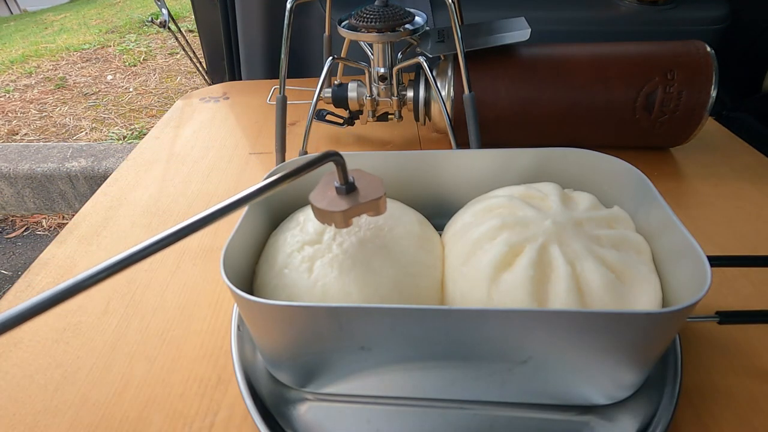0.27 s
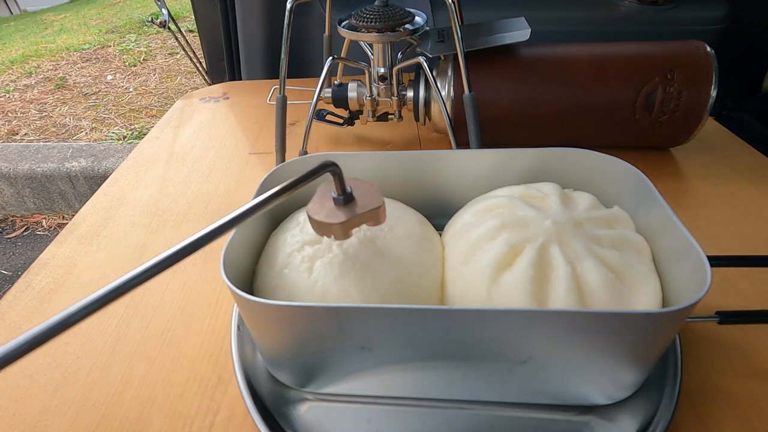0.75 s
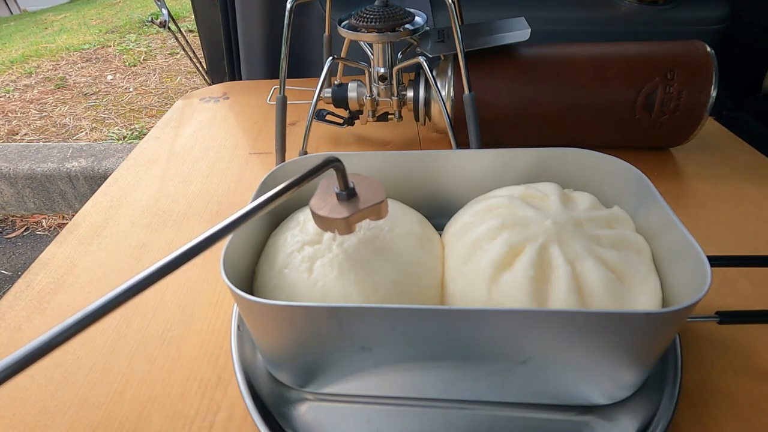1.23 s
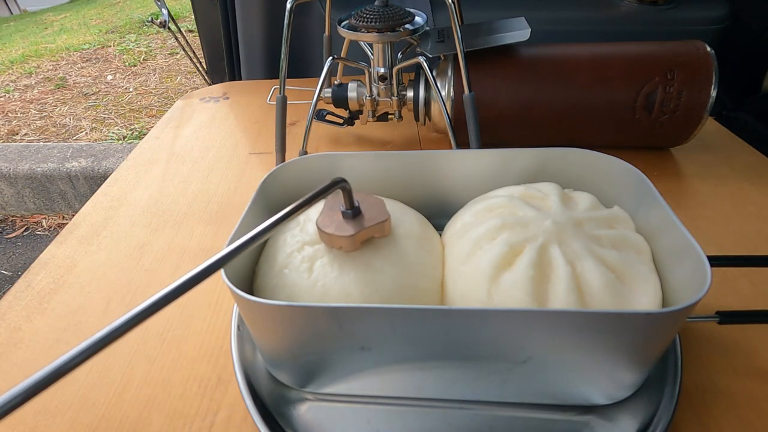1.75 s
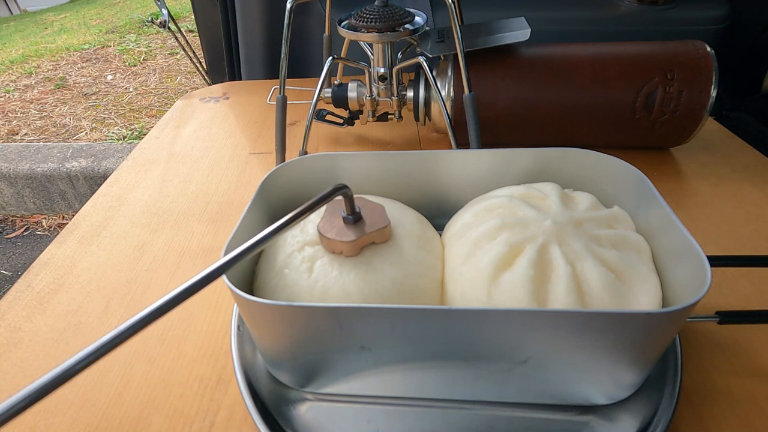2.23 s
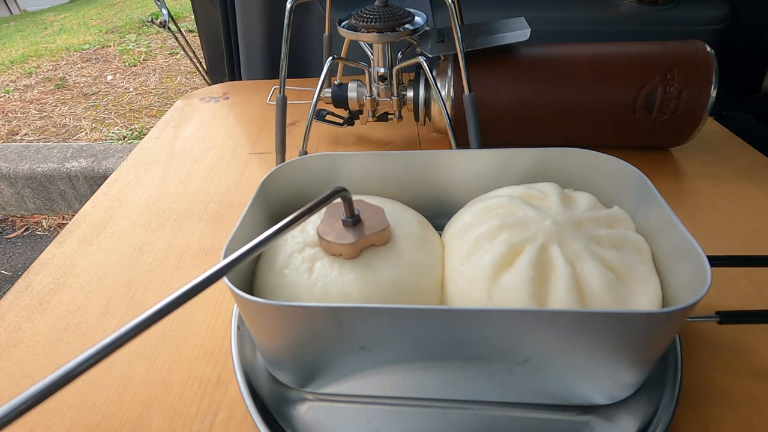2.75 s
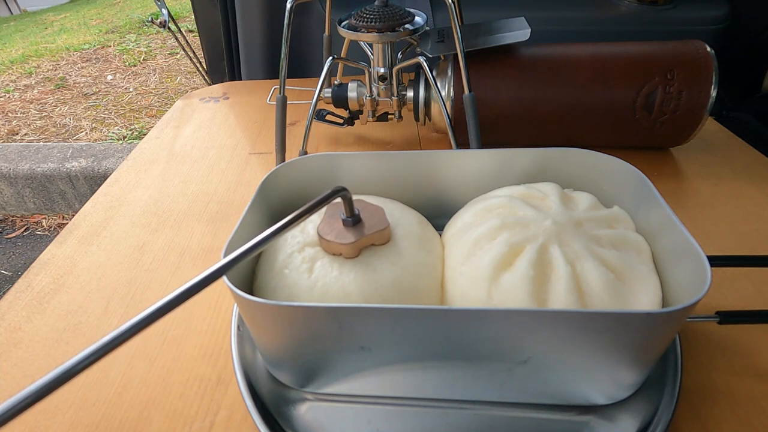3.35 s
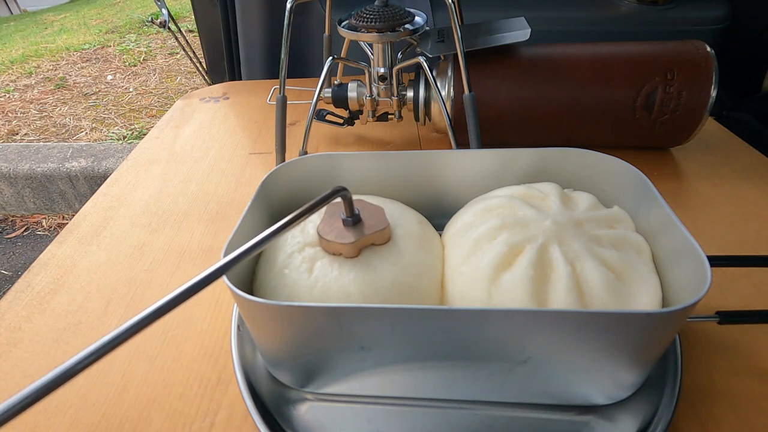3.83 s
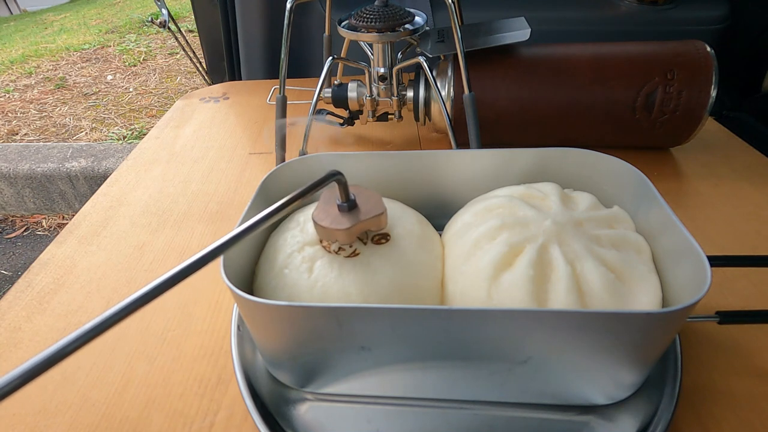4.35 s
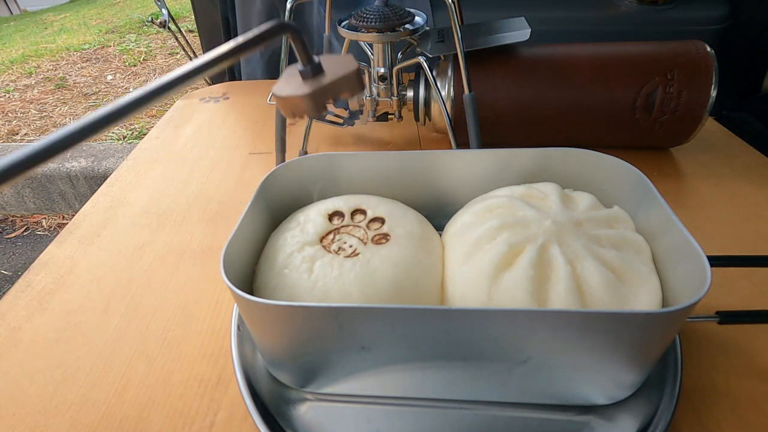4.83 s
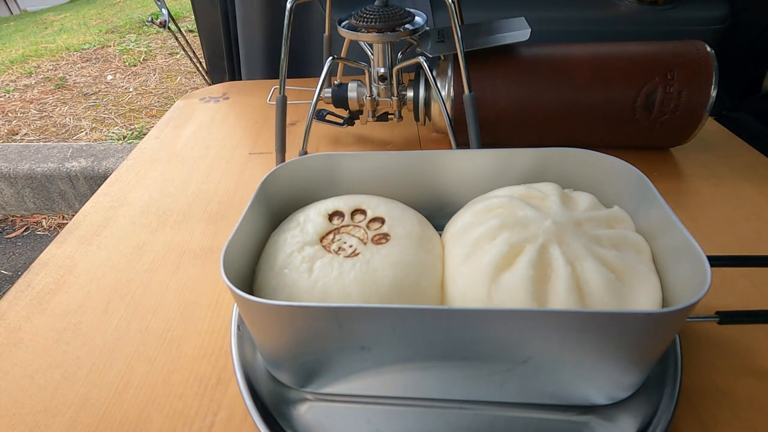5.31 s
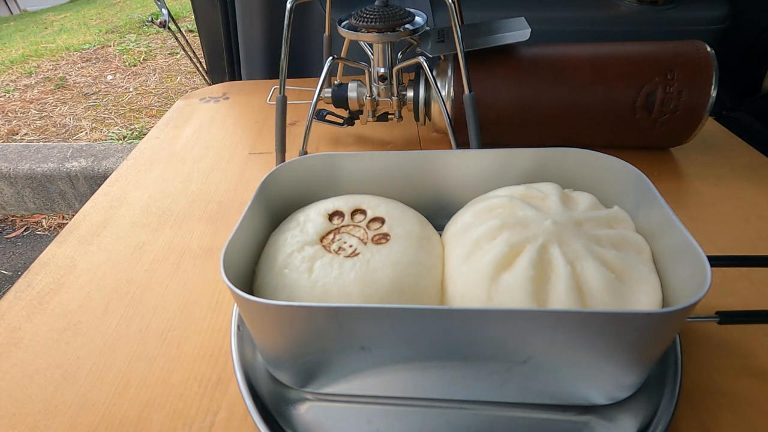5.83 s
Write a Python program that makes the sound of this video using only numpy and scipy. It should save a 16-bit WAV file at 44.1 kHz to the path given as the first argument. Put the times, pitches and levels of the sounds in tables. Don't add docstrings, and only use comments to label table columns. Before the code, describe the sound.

A quiet outdoor place: low wind buffeting the microphone, faint far traffic and leaves, a thin high insect drone and a few distant bird notes. Close up, a hot iron touches a steamed bun with light ticks, then bursts into a dense, bright, crackling sizzle. It grows drier and more broken, stops as the iron lifts, and leaves wind, insects and a far bird whistling more.

```python
import sys
import numpy as np
from scipy import signal
from scipy.fft import rfft, irfft
from scipy.io import wavfile
from scipy.ndimage import uniform_filter1d

SR = 44100
rng = np.random.default_rng(int(sys.argv[2]) if len(sys.argv) > 2 else 0)


def persist_wave(psi):
    counts = np.round(np.clip(psi, -1, 1) * 32767).astype(np.int16)
    wavfile.write(sys.argv[1], SR, np.atleast_2d(counts).T)


def level_to_linear(level):
    exponent = np.asarray(level, float) / 20
    return 10 ** exponent


N = 267687

POCKETS = 10
MEAN_HZ, HZ_PER_POCKET = 7600, 170
RISE_S_PER_KHZ = 3.5e-5


def sizzle():
    vigour_db, steps_up, lull_db, pressed = contact()
    at, peak_db = large_bursts()
    crowd = crowding(at, peak_db)
    bursts = all_bursts(vigour_db - 0.3 * lull_db, crowd, pressed, at, peak_db)
    pops = bursts + steam(vigour_db, lull_db, crowd, pressed)
    thuds = thud_clicks(pops)

    dealt = rng.integers(0, POCKETS, N) + np.round(steps_up).astype(int)
    dealt = np.minimum(dealt, POCKETS - 1)
    lags = 0.045 + 0.33 * rng.permutation(np.linspace(-1, 1, POCKETS))
    by_pitch = np.round(POCKETS / 2 + (burst_pitch(at, steps_up) - MEAN_HZ) / HZ_PER_POCKET)
    dealt[at] = np.clip(by_pitch, 0, POCKETS - 1)
    deep = rng.integers(0, POCKETS // 2, N)

    heard = ringing(pops, dealt, lags) + thudding(thuds, deep, lags) * level_to_linear([[-1.2], [1.2]])
    heard = heard + spray(bursts, vigour_db, lull_db, pressed)
    return lows_first(heard) * level_to_linear([[-.1], [.1]])


# (t/s, vigour level/dB, pitch steps up)
IRON_CONTACT = [
    (1.83, -81, 2),
    (1.88, -59.5, 8),
    (2.12, -51.5, 2),
    (2.19, -44.5, 0),
    (2.45, -40, -2),
    (3.6, -44.5, 0),
    (4.16, -47, 3),
    (4.21, -68, 17),
    (4.3, -81, 3),
]
# (t/s, length/s, depth/dB)
SEAL_LULLS = [(2.58, 0.024, 14), (2.775, 0.054, 8), (2.855, 0.035, 8), (2.96, .03, 14), (3.063, 0.014, 20),
              (3.243, 0.031, 16), (3.4, .016, 12), (3.508, 0.019, 12), (3.56, 0.0086, 18), (3.74, .04, 7),
              (3.81, 0.02, 12), (3.94, 0.016, 8), (4.045, .015, 8), (4.09, 0.017, 10), (4.159, .009, 18)]


def contact():
    vigour_db, steps_up = in_time(IRON_CONTACT)
    t = np.arange(N) / SR
    pressed = (t > IRON_CONTACT[0][0]) & (t < IRON_CONTACT[-1][0])
    return vigour_db, steps_up, bumps(SEAL_LULLS), pressed


# (t/s, peak level/dB, f/Hz)
TOUCH_BURSTS = [(1.8697, -26, 8500), (1.9185, -35, 9200), (1.9356, -32, 8900), (1.9433, -34, 8800),
                (1.9689, -36, 8000), (1.9923, -30, 7200), (2.0087, -33, 7400), (2.0167, -30, 7900),
                (2.0219, -33, 8300), (2.0337, -31, 8500), (2.0419, -26, 8400), (2.0466, -30, 7700),
                (2.0514, -32, 7800), (2.0581, -27, 8200), (2.0624, -31, 8200), (2.0666, -29, 8500),
                (2.0761, -34, 8200), (2.0825, -29, 8400), (2.0878, -34, 8400), (2.0925, -33, 7700),
                (2.1056, -28, 8300), (2.1153, -30, 8300), (2.1232, -36, 8700), (2.1299, -30, 7600),
                (2.1357, -24, 8700), (2.1399, -25, 8600), (2.1466, -25, 8100), (2.1526, -31, 8000),
                (2.1607, -23, 8900), (2.1671, -26, 8400)]
# (t/s, peak level/dB, f/Hz)
PEEL_TICKS = [
    (4.1825, -36, 8800),
    (4.198, -41, 9000),
    (4.2015, -40, 8000),
    (4.208, -44, 9000),
    (4.2344, -28, 7300),
    (4.2373, -37, 8000),
    (4.2631, -31, 7800),
    (4.392, -54, 8000),
    (4.4672, -49, 8500),
]
# (t/s, peak level/dB)
SINKING_BURSTS = [(2.1777, -21), (2.1842, -15), (2.192, -19), (2.1989, -22), (2.208, -17), (2.2222, -23),
                  (2.2248, -21), (2.2384, -24), (2.2429, -23), (2.2468, -24), (2.2579, -19), (2.2681, -23),
                  (2.2693, -20), (2.2766, -22), (2.2829, -18), (2.2903, -20), (2.2917, -19), (2.2956, -18),
                  (2.297, -19), (2.2992, -16), (2.3038, -21), (2.3243, -18), (2.3286, -22), (2.331, -18),
                  (2.3355, -19), (2.3365, -20), (2.3401, -23), (2.3452, -21), (2.3496, -22), (2.3572, -21),
                  (2.3652, -19), (2.3677, -19), (2.3714, -22), (2.3908, -15), (2.4068, -20), (2.4112, -16),
                  (2.4129, -20), (2.4174, -22), (2.4229, -22), (2.4312, -20), (2.4337, -18), (2.4392, -17),
                  (2.4437, -22), (2.448, -20), (2.46, -19), (2.465, -14), (2.4694, -19), (2.4771, -17),
                  (2.48, -20), (2.4823, -19), (2.4834, -13), (2.4952, -18), (2.5016, -18), (2.504, -20),
                  (2.5113, -20), (2.525, -16), (2.5349, -22), (2.5365, -23)]
# (t/s, peak level/dB)
SEALED_BURSTS = [(2.5401, -21), (2.546, -21), (2.5473, -18), (2.5483, -18), (2.5574, -22), (2.5605, -18),
                 (2.5656, -23), (2.5673, -20), (2.5879, -25), (2.5932, -18), (2.597, -19), (2.6025, -22),
                 (2.617, -19), (2.6187, -20), (2.6215, -20), (2.623, -22), (2.6249, -20), (2.6399, -22),
                 (2.6486, -24), (2.6557, -19), (2.6622, -19), (2.6705, -18), (2.6752, -21), (2.6783, -21),
                 (2.6796, -21), (2.6846, -20), (2.6858, -21), (2.6901, -20), (2.6962, -13), (2.6984, -17),
                 (2.7032, -20), (2.7152, -16), (2.7252, -21), (2.7263, -15), (2.7349, -20), (2.7378, -17),
                 (2.7392, -18), (2.7441, -18), (2.7453, -22), (2.7502, -22), (2.7531, -19), (2.7609, -24),
                 (2.765, -23), (2.7675, -23), (2.7706, -23), (2.7722, -23), (2.7828, -25), (2.7844, -23),
                 (2.7871, -19), (2.7916, -20), (2.8083, -20), (2.81, -21), (2.8111, -16), (2.815, -21),
                 (2.8173, -17), (2.8206, -19), (2.8253, -18), (2.833, -22)]
# (t/s, peak level/dB)
SEARING_BURSTS = [(2.8375, -19), (2.8407, -14), (2.8444, -24), (2.8471, -22), (2.8676, -15), (2.8697, -19),
                  (2.8714, -22), (2.878, -18), (2.8801, -20), (2.8902, -14), (2.8915, -15), (2.9064, -16),
                  (2.9076, -15), (2.912, -21), (2.9182, -23), (2.9237, -20), (2.9279, -23), (2.9299, -23),
                  (2.9334, -24), (2.9379, -25), (2.9508, -26), (2.954, -27), (2.9584, -21), (2.9779, -22),
                  (2.9801, -19), (2.983, -16), (2.989, -12), (2.994, -19), (3.0011, -16), (3.0051, -20),
                  (3.0076, -21), (3.0118, -15), (3.0176, -18), (3.0192, -18), (3.0206, -12), (3.0248, -20),
                  (3.0378, -15), (3.0406, -12), (3.0418, -20), (3.0454, -24), (3.0736, -22), (3.0764, -19),
                  (3.0774, -19), (3.081, -24), (3.0826, -20), (3.0911, -20), (3.0924, -19), (3.1026, -24),
                  (3.1072, -22), (3.1088, -14), (3.1135, -18), (3.1248, -22), (3.1306, -25), (3.1324, -23),
                  (3.1441, -14), (3.1461, -19), (3.151, -21), (3.1521, -21)]
# (t/s, peak level/dB)
BROWNING_BURSTS = [(3.1539, -22), (3.1562, -20), (3.1578, -22), (3.1655, -18), (3.1749, -25), (3.1796, -25),
                   (3.1974, -21), (3.2034, -25), (3.2054, -23), (3.2081, -20), (3.2091, -24), (3.2159, -18),
                   (3.2187, -26), (3.2263, -22), (3.2484, -28), (3.2523, -25), (3.2536, -26), (3.2623, -26),
                   (3.2651, -27), (3.2671, -26), (3.2709, -21), (3.2767, -25), (3.2789, -26), (3.2861, -24),
                   (3.2885, -23), (3.2907, -26), (3.2998, -24), (3.3012, -23), (3.3033, -25), (3.3117, -12),
                   (3.3151, -22), (3.3297, -19), (3.3389, -23), (3.3406, -24), (3.3532, -20), (3.3571, -24),
                   (3.3604, -22), (3.3616, -20), (3.369, -16), (3.3735, -23), (3.3771, -23), (3.382, -15),
                   (3.3872, -25), (3.3901, -22), (3.4074, -21), (3.4131, -23), (3.4168, -27), (3.4206, -25),
                   (3.4268, -17), (3.4352, -24), (3.445, -19), (3.4484, -23), (3.4545, -21), (3.4569, -19),
                   (3.4582, -20), (3.4648, -16), (3.4717, -22), (3.4771, -16)]
# (t/s, peak level/dB)
CRUST_BURSTS = [(3.4783, -19), (3.4814, -23), (3.4901, -17), (3.4922, -14), (3.5186, -18), (3.5265, -26),
                (3.5338, -25), (3.541, -23), (3.5466, -15), (3.5546, -22), (3.5708, -16), (3.578, -13),
                (3.5828, -20), (3.5872, -15), (3.5941, -22), (3.5956, -15), (3.6037, -20), (3.6078, -23),
                (3.6175, -12), (3.6215, -18), (3.6262, -15), (3.6331, -16), (3.636, -20), (3.6371, -15),
                (3.6477, -19), (3.6516, -19), (3.6536, -22), (3.6563, -25), (3.6591, -25), (3.6601, -22),
                (3.6678, -15), (3.6705, -25), (3.675, -24), (3.6861, -22), (3.6936, -23), (3.6978, -18),
                (3.709, -23), (3.7132, -23), (3.7144, -21), (3.7204, -25), (3.7258, -28), (3.7339, -30),
                (3.7384, -30), (3.7619, -17), (3.7655, -23), (3.7666, -15), (3.768, -18), (3.7712, -25),
                (3.7737, -17), (3.7749, -18), (3.7939, -25), (3.8021, -26), (3.8283, -14), (3.8373, -15),
                (3.8539, -18), (3.8562, -22), (3.8589, -27), (3.8604, -20)]
# (t/s, peak level/dB)
TWIN_POP = (3.8364, -19)
# (t/s, peak level/dB)
DRY_SPUTTER = [(3.864, -20), (3.8661, -22), (3.8785, -28), (3.8866, -23), (3.8896, -24), (3.8924, -30),
               (3.895, -20), (3.9033, -20), (3.9157, -13), (3.9248, -17), (3.9262, -26), (3.9463, -30),
               (3.9522, -18), (3.959, -28), (3.9621, -24), (3.965, -26), (3.9734, -28), (3.9891, -30),
               (3.998, -24), (3.9997, -28), (4.0019, -17), (4.0071, -26), (4.013, -19), (4.0216, -22),
               (4.023, -26), (4.0268, -23), (4.0311, -28), (4.0343, -19), (4.0364, -22), (4.0563, -19),
               (4.0583, -29), (4.0654, -26), (4.0727, -21), (4.0826, -31), (4.0907, -31), (4.0969, -31),
               (4.098, -31), (4.1015, -29), (4.1065, -24), (4.1082, -27), (4.1097, -27), (4.1111, -26),
               (4.1142, -24), (4.1271, -22), (4.1297, -26), (4.1324, -25), (4.1337, -26), (4.1362, -24),
               (4.1445, -26), (4.1505, -24), (4.1515, -26), (4.1529, -28), (4.1542, -25), (4.1637, -26),
               (4.1655, -22), (4.1667, -23), (4.1791, -31), (4.1914, -33)]


def large_bursts():
    rows = TOUCH_BURSTS + PEEL_TICKS + SINKING_BURSTS + SEALED_BURSTS + SEARING_BURSTS
    rows = rows + BROWNING_BURSTS + CRUST_BURSTS + [TWIN_POP] + DRY_SPUTTER
    s, peak_db = np.transpose([row[:2] for row in rows])
    start_s = s - .00036 - RISE_S_PER_KHZ * MEAN_HZ / 1000
    return np.round(start_s * SR).astype(int), peak_db


def burst_pitch(at, steps_up):
    pitch_hz = MEAN_HZ + 160.0 * steps_up[at] + 250.0 * rng.standard_normal(N)[at]
    pitched = TOUCH_BURSTS + PEEL_TICKS
    pitch_hz[:len(pitched)] = np.array(pitched)[:, 2]
    return pitch_hz


def crowding(at, peak_db):
    large = np.zeros(N)
    large[at] = level_to_linear(peak_db)
    near = uniform_filter1d(uniform_filter1d(large, size=220), size=220)
    return (near / (uniform_filter1d(near, size=5000) + 1e-7) + 0.55) ** 0.28


def all_bursts(small_db, crowd, pressed, at, peak_db):
    per_s = 1000
    clump = crowd * level_to_linear(2.0 * drift(130.0))
    born = pressed & (rng.random(N) < per_s * clump / SR)
    signs = rng.choice([-1, 1], N)
    spread_db = 6.0 + 4.16 * np.minimum(rng.exponential(1, N), 2.0)
    bursts = born * signs * level_to_linear(small_db + spread_db) * clump ** 0.062 / np.sqrt(per_s / 1000)
    bursts[at] = signs[at] * level_to_linear(peak_db - 0.5)
    return bursts


def steam(vigour_db, lull_db, crowd, pressed):
    t = np.arange(N) / SR
    drying_db = 10.5 * np.maximum(t - 2.66, 0)
    level_db = vigour_db + 9 - 0.45 * lull_db - drying_db
    return pressed * level_to_linear(level_db - 17.0) * crowd ** .5 * rng.standard_normal(N)


# (f/Hz, level/dB per Hz)
RING_SPECTRUM = [(2470, -45.5), (4200, -13.5), (4900, -9), (5590, -9.5), (6460, -4), (7440, -5), (9000, -8),
                 (10000, -10.5), (11300, -23), (14700, -55), (22000, -120)]
# (f/Hz, width/Hz, level/dB)
TIN_MODES = [(5280, 190, -13.5), (7170, 130, -13), (7420, 310, -5), (8030, 84, -3.5), (9040, 260, -12),
             (9820, 500, -9), (11700, 180, 3)]


def ringing(pops, dealt, lags):
    rings = sum(pocket(pops * (dealt == k), RING_SPECTRUM, hz, lags[k],
                       ring_share=1.92, echo_db=-14, spread_db=-22.0)
                for k, hz in enumerate(np.geomspace(6200., 9300., POCKETS)))
    return rings + sum(level_to_linear(db) * resonance(rings, hz, width) for hz, width, db in TIN_MODES)


# (t/s, peak level/dB)
WET_THUDS = [(2.2982, -47), (2.3354, -42), (2.41, -35), (2.484, -39), (2.4951, -35), (2.5131, -34),
             (2.608, -30), (2.678, -39), (2.697, -30), (2.7257, -29.5), (2.82, -33), (3.0178, -29),
             (3.0403, -39), (3.091, -28.5), (3.1134, -32), (3.151, -24), (3.285, -31.5), (3.3113, -29),
             (3.4248, -30), (3.4688, -29), (3.479, -30), (3.4921, -30), (3.527, -27), (3.5466, -22),
             (3.587, -29), (3.596, -30), (3.619, -34), (3.625, -30), (3.636, -34), (4.234, -44)]


def thud_clicks(pops):
    thuds = np.sign(pops) * np.abs(pops) ** 0.68 * level_to_linear(-22.5 + 2 * rng.standard_normal(N))
    s, peak_db = np.transpose(WET_THUDS)
    thuds[np.round((s - .0003) * SR).astype(int)] = level_to_linear(peak_db + 2.5)
    return thuds


# (f/Hz, level/dB per Hz)
THUD_SPECTRUM = [(530, -23), (900, -6), (1410, -1), (1690, -6.5), (1870, -2.5), (2060, -4), (3000, -3.5),
                 (3850, -6), (4700, -2.5), (6500, -8), (10100, -65)]


def thudding(thuds, deep, lags):
    return sum(pocket(thuds * (deep == k), THUD_SPECTRUM, hz, lags[k],
                      ring_share=0.27, echo_db=-23.0, spread_db=-19.0)
               for k, hz in enumerate(np.geomspace(1300., 3100., POCKETS // 2)))


# (f/Hz, level/dB per Hz)
SPRAY_SPECTRUM = [(6470, -22), (11000, -5), (13200, -6.5), (14500, -10), (16000, -20)]


def spray(bursts, vigour_db, lull_db, pressed):
    level_db = 0.52 * (vigour_db + 44) - 58.5 - 0.2 * lull_db
    fade = np.exp(-1 / (0.00086 * SR))
    puffs = signal.lfilter([1], [1, -fade], np.abs(bursts) + 1e-18)
    puffs = (puffs / (uniform_filter1d(puffs, size=4000) + 1e-6) + 0.95) * pressed
    mid, side = rng.standard_normal((2, N))
    hiss = np.array([mid + 0.5 * side, mid - 0.72 * side])
    return coloured(level_to_linear(level_db - 10.5 + 1.3 * drift(34.0)) * puffs * hiss, SPRAY_SPECTRUM)


def pocket(clicks, colour, hz, lag, ring_share, echo_db, spread_db):
    shape = causal_response(colour)
    shape = shape + ring_share * resonance(resonance(shape, hz, 3600.0), hz, 3600.0)
    k = np.arange(140)
    taps = np.sinc(k - 6 - np.array([[0], [lag]])) * np.hanning(280)[140:]
    taps[:, 6 + rng.integers(28, 38)] += level_to_linear(echo_db)
    taps += (k > 6) * level_to_linear(spread_db - 0.27 * k) * rng.standard_normal((2, 140))
    response = signal.oaconvolve(shape[None], taps, axes=1)
    response = response / np.abs(response).max()
    return signal.oaconvolve(clicks[None], response, axes=1)[:, :N]


def lows_first(x):
    hz = np.fft.rfftfreq(N, 1 / SR)
    return irfft(rfft(x) * np.exp(-1j * np.pi * RISE_S_PER_KHZ / 1000 * hz ** 2), N)


# (f/Hz, level/dB per Hz)
DEEP_SPECTRUM = [(8.8, -47), (15, -18), (54, 6.5), (80, -3.5), (100, -39), (180, -120)]
# (f/Hz, level/dB per Hz)
UPPER_SPECTRUM = [(53, -29), (90, 0), (156, -4.5), (215, -8.5), (270, -8.5), (330, -16), (430, -24),
                  (730, -120)]
# (t/s, length/s, level/dB above the mean)
WIND_GUSTS = [(0, 0.051, 1), (.25, 0.039, 5), (.75, 0.76, 5), (1.32, 0.13, -8), (1.76, 0.28, 5.5),
              (2.02, 0.2, -3), (2.9, 0.053, -8), (3.0, 0.084, 8), (3.29, 0.039, 11.5), (3.47, 0.12, 5.5),
              (3.6, 0.063, -13), (3.65, 0.046, 4.5), (3.87, 0.22, -1.5), (4.14, 0.045, -10),
              (4.33, 0.16, 4.5), (4.8, 0.87, 7.5), (5.52, 0.18, 7), (5.7, 0.088, 14.5), (5.87, 0.1, -2.5),
              (5.99, 0.044, 6.5), (6.04, 0.06, -8)]


def rumble():
    out, gust_db = 0, bumps(WIND_GUSTS)
    for spectrum, level_db in ((DEEP_SPECTRUM, -43.5 + gust_db), (UPPER_SPECTRUM, -45 + 0.068 * gust_db)):
        noise = outdoor_noise(spectrum)
        swell = np.sqrt(uniform_filter1d(noise.mean(axis=0) ** 2, size=4000) + 1e-3)
        out = out + level_to_linear(level_db) * rms_one(noise / swell ** 0.12)
    return out


# (f/Hz, level/dB per Hz)
AIR_SPECTRUM = [(190, -42), (330, -7.5), (417, 1), (476, -2), (667, -2), (844, -7.5), (935, -4.5),
                (1290, -6.5), (2720, -13.5), (2950, -18.5), (3450, -17.5), (4180, -18), (4910, -21.5),
                (6680, -21), (8570, -27.5), (11000, -54.5), (14300, -79), (22000, -120)]
# (t/s, level/dB)
AIR_LOUDNESS = [(0, -54), (1, -54.5), (2, -52.5), (3, -50.5), (4, -55), (5, -52.5), (6.07, -51.5)]


def open_air():
    level_db = in_time(AIR_LOUDNESS)[0] + 0.01 * bumps(WIND_GUSTS) + 1.06 * drift(0.33)
    return level_to_linear(level_db) * outdoor_noise(AIR_SPECTRUM)


# (f/Hz, width/Hz, level/dB)
CHORUS_BANDS = [(6600, 280, -1), (6870, 36, -11), (7490, 120, -4.5), (8000, 33, -7.5), (7500, 25, -9),
                (8600, 120, -11), (9100, 65, -18)]
# (t/s, level/dB)
CHORUS_LOUDNESS = [(0, -70), (.9, -69), (1.8, -65), (4.3, -65), (5.2, -62), (6.07, -61.5)]
# (t/s, f/Hz, level/dB)
NEAR_CRICKET = [(0, 6040, -79), (1.8, 6045, -79), (4.3, 6100, -71.5), (6.07, 6105, -72)]


def insects():
    noise = outdoor_noise([(100, 0), (20000, 0)])
    bands = sum(level_to_linear(db + 1.8 * drift(29.0)) * resonance(resonance(noise, hz, 2.5 * width), hz, 2.5 * width)
                for hz, width, db in CHORUS_BANDS)
    pitch, level_db = in_time(NEAR_CRICKET)
    phase = 2 * np.pi * np.cumsum(pitch + 15.0 * drift(30.)) / SR
    line = np.sin(phase) * level_to_linear(level_db + 3.7 * drift(15.))
    return level_to_linear(in_time(CHORUS_LOUDNESS)[0]) * rms_one(bands) + line * level_to_linear([[1.5], [-.7]])


# (t/s, length/s, first f/Hz, last f/Hz, level/dB)
BIRD_NOTES = [(.28, .02, 3250, 3250, -77), (0.302, 0.036, 3650, 3620, -67), (.555, .03, 3900, 4300, -79),
              (0.595, .042, 4620, 4850, -78), (4.42, 0.14, 4030, 4230, -70), (4.56, .072, 4060, 4220, -70),
              (4.631, 0.19, 4060, 4150, -69), (4.821, .042, 4180, 3640, -69.5),
              (4.89, .037, 5250, 4700, -73), (4.925, .015, 4700, 5100, -79), (4.96, 0.053, 3950, 4150, -68),
              (5.013, .038, 4200, 4540, -73), (5.052, .055, 4500, 3940, -71.5),
              (5.11, 0.055, 4300, 4200, -67.5), (5.165, 0.038, 4200, 3620, -68),
              (5.232, .03, 5560, 5070, -73), (5.25, .02, 2560, 2670, -72), (5.5, .035, 2175, 2250, -70),
              (5.5, 0.06, 4020, 4300, -72), (5.56, 0.2, 4300, 4330, -70), (5.76, 0.035, 4330, 4110, -69),
              (5.795, 0.06, 4110, 4090, -68), (5.855, 0.036, 4090, 3880, -69)]


def birds():
    song = np.zeros(N)
    waver_hz, flutter_db = 32 * drift(70.), 3.3 * drift(45.0)
    for s, length, first_hz, last_hz, level_db in BIRD_NOTES:
        span = slice(int(s * SR), int((s + length) * SR))
        t = np.arange(span.stop - span.start) / SR
        pitch = first_hz + (last_hz - first_hz) * t / length + waver_hz[span]
        ends = np.clip(np.minimum(t, length - t) / 0.0017, 0, 1)
        tone = np.sqrt(2) * np.sin(2 * np.pi * np.cumsum(pitch) / SR)
        song[span] += ends * level_to_linear(level_db + flutter_db[span]) * tone
    trees = rng.standard_normal((2, 6000)) * level_to_linear(-36.5 - 60 * np.arange(6000) / SR / .3)
    echoes = signal.oaconvolve(song[None], trees, axes=1)[:, :N]
    return np.array([song * level_to_linear(7.5), np.roll(song, shift=2) * level_to_linear(3.5)]) + echoes


# (f/Hz, left-right likeness)
EAR_LIKENESS = [(60, 1.0), (130, 1.0), (290, 0.98), (640, 0.77), (1410, 0.65), (3100, 0.72), (6820, 0.91),
                (15000, 0.99)]
# (f/Hz, left minus right level/dB)
EAR_LEAN = [(60, 0), (110, 0.5), (200, 0), (380, 1), (700, 3.5), (1290, 2.5), (2380, 3), (4400, 1.5),
            (8120, -1), (15000, 5)]


def outdoor_noise(spectrum):
    hz = np.maximum(np.fft.rfftfreq(N, 1 / SR), 1)
    mid, side = rfft(rng.standard_normal((2, N))) * level_to_linear(at_hz(spectrum, hz))
    alike = np.clip(at_hz(EAR_LIKENESS, hz), 0, .9993)
    lean = level_to_linear(at_hz(EAR_LEAN, hz) / 2)
    mid, side = np.sqrt(1 + alike) * mid, np.sqrt(1 - alike) * side
    return rms_one(irfft([(mid + side) * lean, (mid - side) / lean], N))


def causal_response(spectrum, size=1024):
    hz = np.maximum(np.fft.rfftfreq(size, 1 / SR), 1)
    cepstrum = irfft(np.log(level_to_linear(at_hz(spectrum, hz))), size)
    cepstrum[1:size // 2] *= 2
    cepstrum[size // 2 + 1:] = 0
    response = irfft(np.exp(rfft(cepstrum)), size)
    return response / np.abs(response).max()


def coloured(x, spectrum):
    return signal.oaconvolve(x, causal_response(spectrum)[None], axes=1)[:, :N]


def resonance(x, hz, width_hz):
    r = np.exp(-np.pi * width_hz / SR)
    zeros = np.array([1, 0, -1]) * (1 - r * r) / 2
    return signal.lfilter(zeros, [1, -2 * r * np.cos(2 * np.pi * hz / SR), r * r], x)


def drift(rate):
    r = np.exp(-16 * np.pi * rate / SR)
    slow = signal.lfilter([1], [1, -2 * r, r * r], rng.standard_normal(N // 8 + 5002))[5000:]
    return np.interp(np.arange(N) / 8, np.arange(len(slow)), rms_one(slow - slow.mean()))


def bumps(rows):
    t = np.arange(N) / SR
    return sum(height * np.exp(-(2 * (t - s) / length) ** 2) for s, length, height in rows)


def in_time(rows):
    s, *columns = np.transpose(rows)
    return [np.interp(np.arange(N) / SR, s, c) for c in columns]


def at_hz(points, hz):
    return np.interp(np.log(hz), np.log(np.array(points)[:, 0]), np.array(points)[:, 1])


def rms_one(x):
    return x / np.sqrt(np.mean(x ** 2) + 1e-20)


def scene():
    air = open_air()
    return sizzle() + rumble() + air + insects() + birds()


def band_limit(x):
    return signal.sosfilt(signal.butter(12, 16660, fs=SR, output="sos"), x)


def record(dry):
    mix = signal.sosfilt(signal.cheby2(10, 60, 17000., fs=SR, output="sos"), dry)
    return band_limit(mix)


dry = scene()
out = record(dry)
persist_wave(out)
```